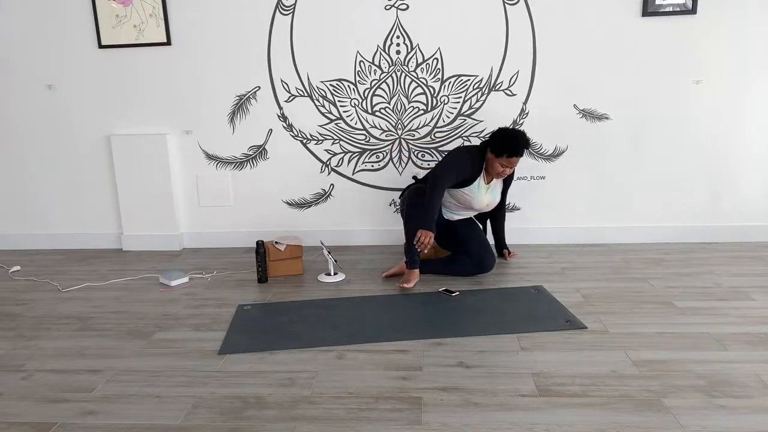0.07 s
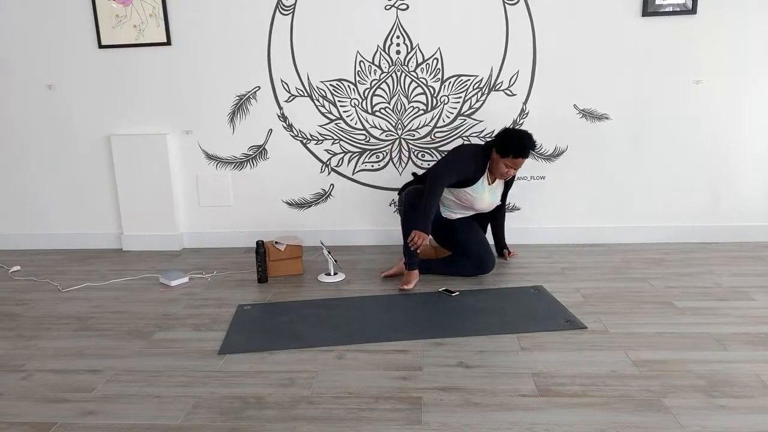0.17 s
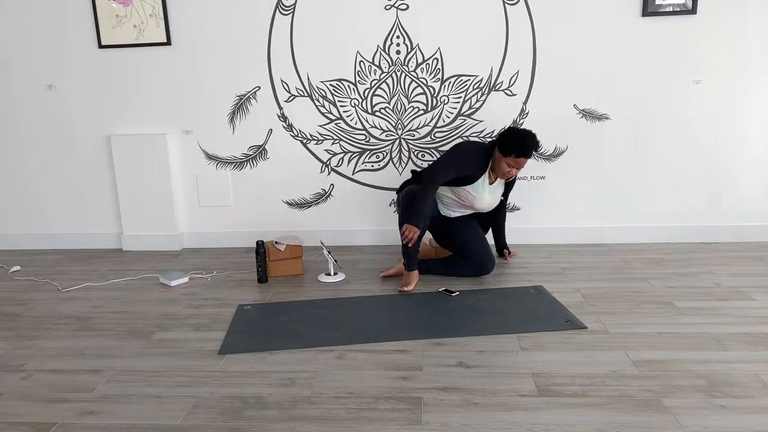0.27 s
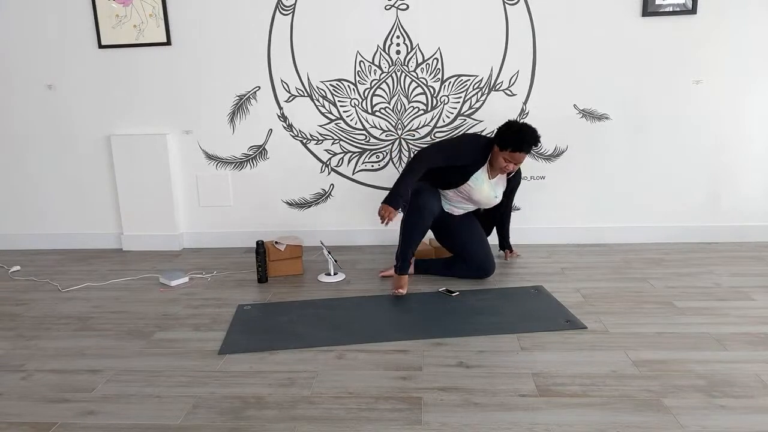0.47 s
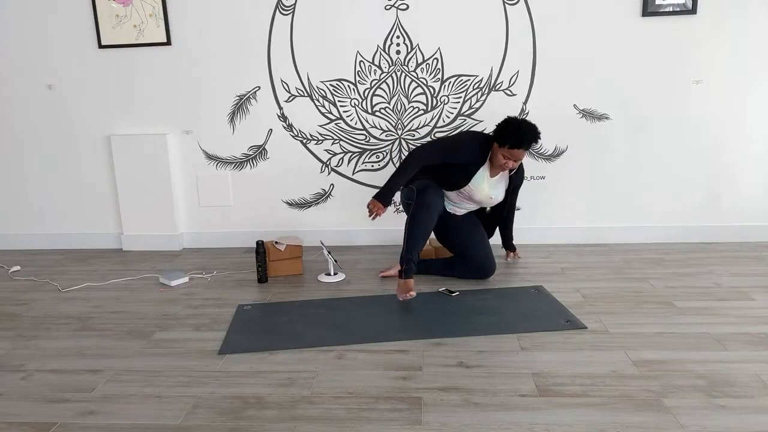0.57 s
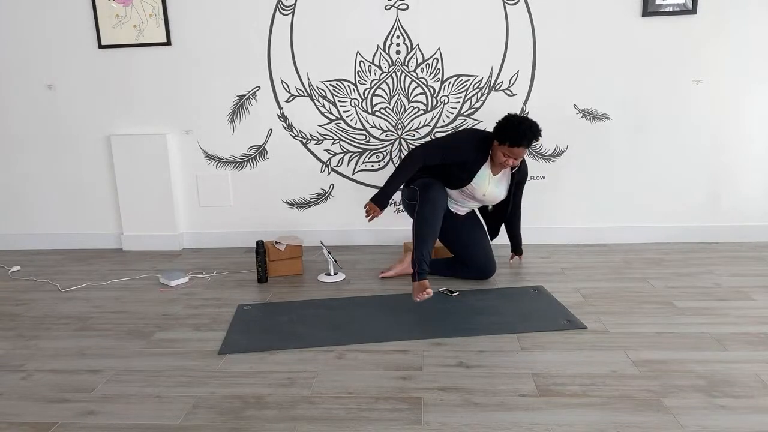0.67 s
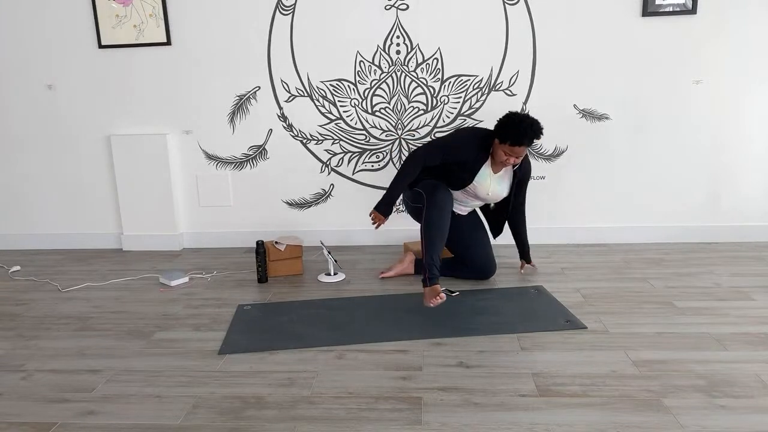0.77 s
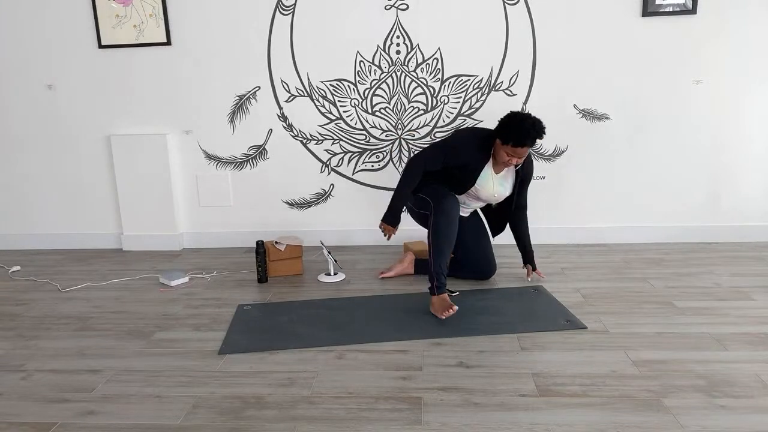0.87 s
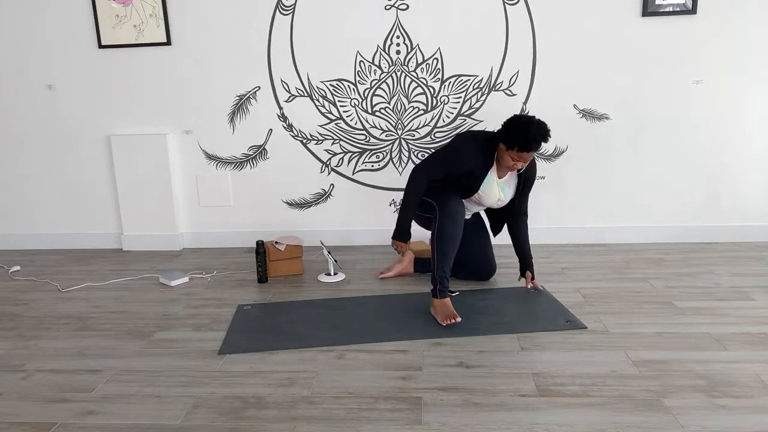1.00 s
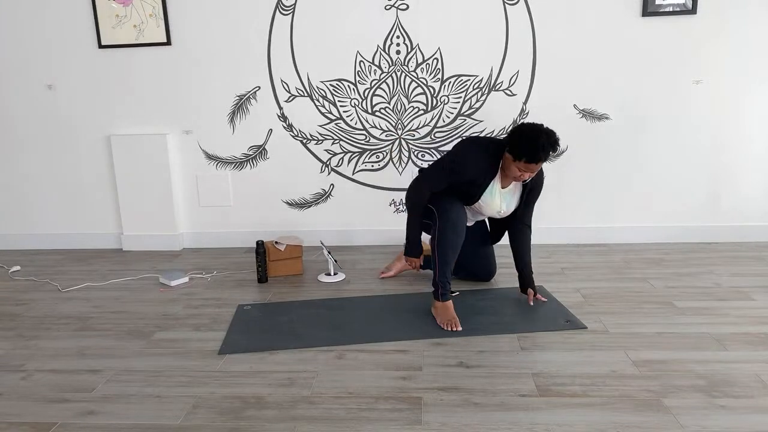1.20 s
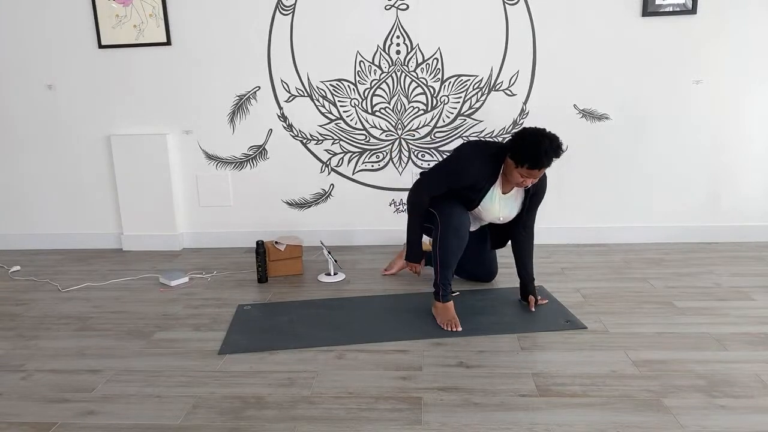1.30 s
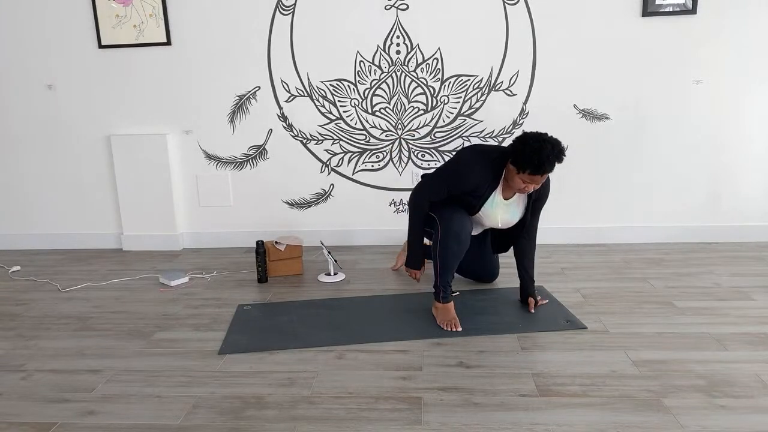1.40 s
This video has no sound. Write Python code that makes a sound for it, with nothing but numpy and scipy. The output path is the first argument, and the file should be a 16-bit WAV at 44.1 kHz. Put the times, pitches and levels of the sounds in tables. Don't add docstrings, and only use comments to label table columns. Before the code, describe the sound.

One hard knock of a block on floorboards, echoing boomily, followed by tiny creaks and rustles

```python
import sys
import numpy as np
from scipy import signal
from scipy.io import wavfile

SR = 44100
rng = np.random.default_rng(int(sys.argv[2]) if len(sys.argv) > 2 else 0)


def unload_audio(sound):
    columns = np.transpose(np.atleast_2d(sound))
    steps = np.round(np.clip(columns, -1, 1) * 32767)
    wavfile.write(sys.argv[1], SR, steps.astype(np.int16))


def voltage_ratio(decibels):
    exponent = np.asarray(decibels, float) / 20
    return 10 ** exponent


N = 63945

# frequency in Hz, level in dB per Hz.
HISS_COLOUR = [(30, -18.5), (110, -8), (280, 3.5), (500, -3), (1200, -8), (3200, -7.5), (6900, -17.5),
               (8000, -32), (17000, -39.5)]
HISS_DB, HISS_PATCHY_DB, HISS_FLICKER_PER_S = -77, 1.72, 14

# time in seconds, peak in dB.
TICK_STRIKES = [
    [(.9880, -51)],
    [(1.248, -51.5)],
    [(1.2920, -42), (1.2935, -48), (1.3000, -59)],
    [(.0482, -62), (.0545, -59.5), (.0600, -61), (.0655, -59.5), (.1150, -71), (1.3550, -65),
     (1.3600, -66.5)],
    [(1.3810, -63), (1.3845, -63.5)],
    [(1.4400, -76), (1.4436, -36), (1.4452, -61), (1.4482, -51)],
    [(.0702, -48), (.0715, -49.5), (.0950, -57.5)],
    [(.9020, -65.5)],
]
# frequency in Hz, level in dB, 60 dB decay in seconds.
TICK_BODIES = [
    [(1810, -13.5, 0.045), (2350, 1.5, 0.016), (3192, -38, 0.017)],
    [(520, 4.5, 0.0163), (2498.7, -16.5, 0.012), (4489, -20.5, 0.01836)],
    [(257.3, -10, .03), (779.4, -6.5, 0.01434), (1504.3, -2.5, 0.016112), (1776, -7.5, .018),
     (3020, -7.5, .01), (4500, -11, .01), (5080, -15.5, .01), (5850, -10.5, 0.008)],
    [(820, 6.5, 0.021)],
    [(233.9, 2, 0.023), (383.7, 0.5, 0.0194)],
    [(1856, 4.5, .018), (2331.7, 0.5, 0.016), (3343, 8.5, 0.0049), (4440, -16.5, 0.012),
     (6160, -15, 0.0062)],
    [(453, -4, 0.0083), (830.77, 1.5, 0.018), (1020, -7, 0.013)],
    [(890, 3, .05), (2970, -4, 0.04226)],
]
BODY_SKIRT = 1.5

# start in seconds, length in seconds.
RUB_STROKES = [(.074, .082), (.092, .032), (.09, .035), (.05, .08), (.519, .013), (.886, .036), (.79, .13),
               (1.14, .03), (1.296, .018), (.735, .035), (.99, .02), (1.2465, .009), (1.42, .022)]
# rms in dB, centre in Hz, width in octaves.
RUB_SOUNDS = [(-69.5, 810, 0.72), (-67.5, 790, 0.5), (-80, 1250, 0.7), (-78.5, 2900, 0.57), (-69, 3900, .9),
              (-70, 4600, 1.9613), (-80.5, 3030, 0.29), (-83, 3400, 0.49), (-74, 1900, 2.4),
              (-74, 560, 0.9), (-78, 2154, 0.9), (-73, 2900, 1.4), (-76, 2600, 1.0)]
RUB_ATTACK_S, RUB_FADE, RUB_LUMPY_DB = 0.0034, 0.22, 2.5

# time in seconds, strength in dB, contact
# length in milliseconds.
BLOCK_CONTACTS = [
    (.2092, -31.5, .5),
    (.2145, -36, .4),
    (0.216, -12.5, 0.043),
    (.2178, 1, 0.13),
    (0.2209, -8, 0.1),
    (0.2273, -16.5, 0.1),
    (0.2309, -16.5, .25),
    (.2375, -14, .3),
]
# frequency in Hz, level in dB, 60 dB decay in seconds.
BOARD_MODES = [(330, -24, 0.01), (513, 1, 0.018), (802.17, -6, 0.049), (1280, -13, 0.017),
               (1800, -20, 0.0074), (2692, -25, 0.0063), (3253.8, -32, 0.007)]
BOARD_TOP_HZ, THUMP_DB = 4300.6, 0.66

# frequency in Hz, level in dB per Hz.
TAIL_COLOUR = [(50, -49.5), (110, -34.5), (220, -8.5), (320, -7), (600, -3.5), (1000, -11), (2100, -28),
               (3600, -37), (4900, -67.5), (8000, -74)]
# frequency in Hz, 60 dB decay in seconds.
ROOM_DECAY = [(100, .62), (500, 0.74), (1200, 0.7), (2200, 0.5193), (4000, .5), (6000, .9)]
TAIL_START_S, TAIL_BUILD_S, TAIL_DB, TAIL_PATCHY_DB = .221, .012, -16.5, 1.5
# time in seconds, level in dB, width in seconds.
ECHO_SWELLS = [
    (0.262, -0.5, 0.0092),
    (0.328, 2.5, 0.015),
    (0.374, 0.5, 0.0054),
    (0.679, 3.5, 0.046),
]
# frequency in Hz, time in seconds.
SUPPRESSOR_SHUT = [(120, 0.67), (200, 0.737), (950, 0.701), (1300, 0.619), (1850, 0.58), (2020, 0.35),
                   (3600, .4), (3900, 0.29), (4700, .24), (5600, .3), (8000, 0.57)]
SHUT_DB_PER_S, SHUT_DEPTH_DB = 587.5, 12

MIC_CUT_HZ, MIC_TOP_HZ = 230, 7900
DRIVE_DB, OFFSET, CEILING = .25, -.0003, 1


def rms_one(x):
    return x / np.sqrt(np.mean(x ** 2) + 1e-20)


def at_hz(points, hz):
    point_hz, value = np.transpose(points)
    return np.interp(np.log(hz), np.log(point_hz), value)


def drift(rate):
    step = 20
    r = np.exp(-2 * np.pi * rate * step / SR)
    white = rng.standard_normal(N // step + 1002)
    slow = signal.lfilter([1], [1, -2 * r, r * r], white)[1000:]
    return np.interp(np.arange(N) / step, np.arange(len(slow)), rms_one(slow))


def ring(clicks, modes, ratio):
    out = 0
    for k, (hz, db, t60) in enumerate(modes):
        r = voltage_ratio(-60 / (t60 * SR))
        w = 2 * np.pi * hz / SR
        resonator = [1, -2 * r * np.cos(w), r * r]
        out = out + ratio ** k * signal.lfilter([0, voltage_ratio(db) * np.sin(w)], resonator, clicks + 1e-18)
    return out


def bands(low, top, count):
    edges = low * 2 ** np.arange(0, np.log2(top / low), 1 / count)
    white = rng.standard_normal((2, N + 4000))
    for k, (a, b) in enumerate(zip(edges, edges[1:])):
        band = signal.butter(3, [a, b], "band", fs=SR, output="sos")
        yield np.sqrt(a * b), signal.sosfilt(band, white[k % 2])[4000:]


def hiss():
    out = 0
    for hz, noise in bands(20, 19000, count=4):
        flicker_db = HISS_PATCHY_DB * drift(HISS_FLICKER_PER_S)
        out = out + noise * voltage_ratio(at_hz(HISS_COLOUR, hz) + flicker_db)
    return voltage_ratio(HISS_DB) * rms_one(out)


def ticks():
    out = 0
    for strikes, modes in zip(TICK_STRIKES, TICK_BODIES):
        clicks = np.zeros(N)
        for s, db in strikes:
            clicks[int(s * SR)] = voltage_ratio(db)
        edges = [modes[0][0] / BODY_SKIRT, modes[-1][0] * BODY_SKIRT]
        band = signal.butter(2, edges, "band", fs=SR, output="sos")
        out = out + signal.sosfilt(band, ring(clicks, modes, -1.045))
    return out


def rubs():
    t, out = np.arange(N) / SR, 0
    for (s, length), (db, hz, octaves) in zip(RUB_STROKES, RUB_SOUNDS):
        edges = np.clip(hz * 2. ** (np.array([-.5, .5]) * octaves), 20, .45 * SR)
        band = signal.butter(2, edges, "band", fs=SR, output="sos")
        noise = signal.sosfilt(band, rng.standard_normal(N))
        rise = (t - s) / RUB_ATTACK_S
        fade = (s + length - t) / (RUB_FADE * length)
        stroke = np.clip(np.minimum(rise, fade), 0, 1)
        out = out + rms_one(noise) * stroke * voltage_ratio(db + RUB_LUMPY_DB * drift(85))
    return out


def thump():
    t, force = np.arange(N) / SR, np.zeros(N)
    for s, db, ms in BLOCK_CONTACTS:
        push = np.exp(-.5 * ((t - s) / (ms / 2000)) ** 2)
        force -= voltage_ratio(db + THUMP_DB) * push / push.sum()
    soften = signal.butter(5, BOARD_TOP_HZ, fs=SR, output="sos")
    return signal.sosfilt(soften, ring(force, BOARD_MODES, 0.97))


def room_tail():
    t, out, power = np.arange(N) / SR, 0, 0
    after = np.maximum(t - TAIL_START_S, 0)
    together = drift(40)
    for hz, noise in bands(45, 9000, count=6):
        shut_db = np.clip((t - at_hz(SUPPRESSOR_SHUT, hz)) * SHUT_DB_PER_S, 0, SHUT_DEPTH_DB)
        fall_db = 60 * after / at_hz(ROOM_DECAY, hz) + shut_db
        patchy_db = TAIL_PATCHY_DB * (together + 0.64 * drift(45))
        level = voltage_ratio(at_hz(TAIL_COLOUR, hz))
        out = out + noise * level * voltage_ratio(patchy_db - fall_db)
        power += level ** 2 * np.mean(noise ** 2)
    swell_db = sum(db * np.exp(-.5 * ((t - s) / width) ** 2) for s, db, width in ECHO_SWELLS)
    build = 1 - np.exp(-after / TAIL_BUILD_S)
    return voltage_ratio(TAIL_DB + swell_db) * out / np.sqrt(power) * build


def scene():
    thin = signal.butter(4, MIC_CUT_HZ, "high", fs=SR, output="sos")
    dull = signal.cheby2(8, 50, MIC_TOP_HZ * 1.15, fs=SR, output="sos")
    contacts = signal.sosfilt(thin, thump() + ticks())
    heard = signal.sosfilt(dull, contacts + room_tail() + rubs())
    return (heard + hiss())[None]


def low_pass(x):
    return signal.sosfilt(signal.butter(12, 17700, fs=SR, output="sos"), x)


def record(dry):
    mix = np.clip(voltage_ratio(DRIVE_DB) * dry + OFFSET, -CEILING, CEILING)
    return low_pass(mix)


dry = scene()
out = record(dry)
unload_audio(out)
```